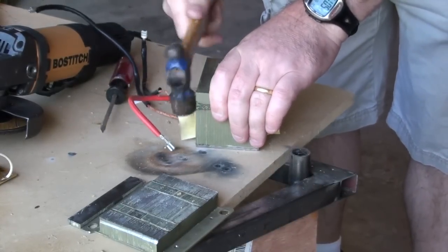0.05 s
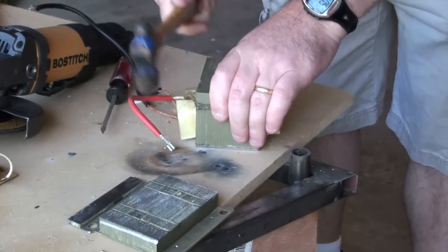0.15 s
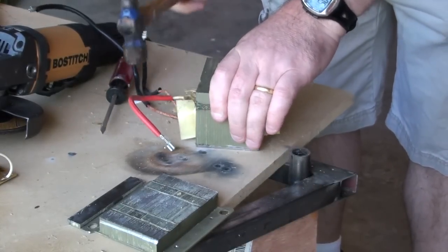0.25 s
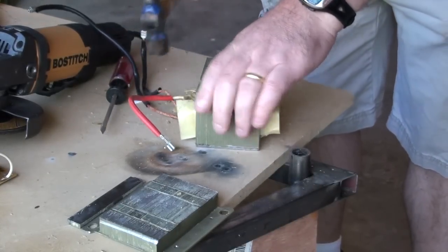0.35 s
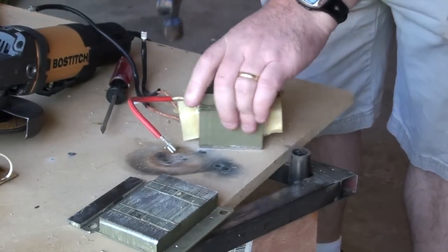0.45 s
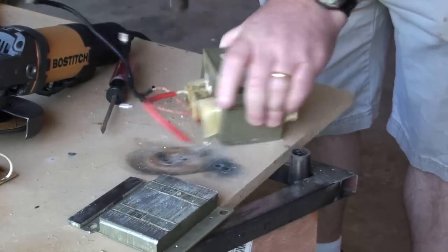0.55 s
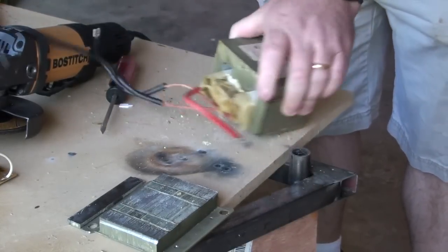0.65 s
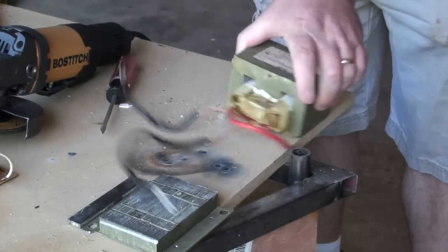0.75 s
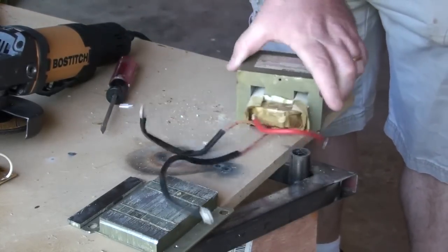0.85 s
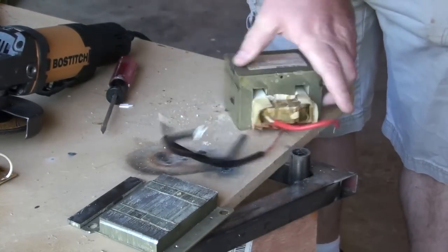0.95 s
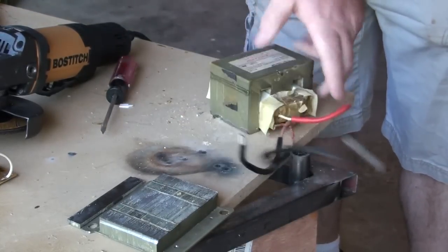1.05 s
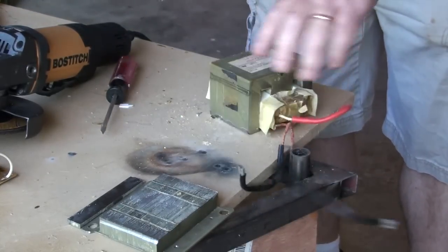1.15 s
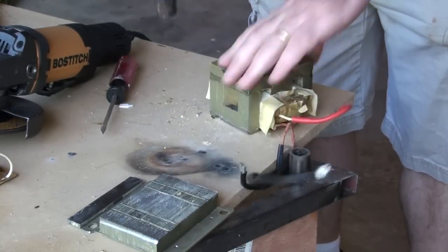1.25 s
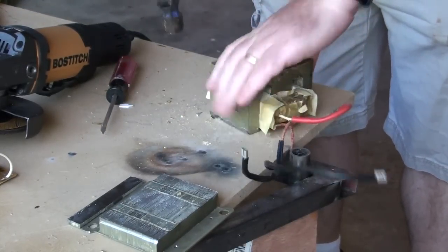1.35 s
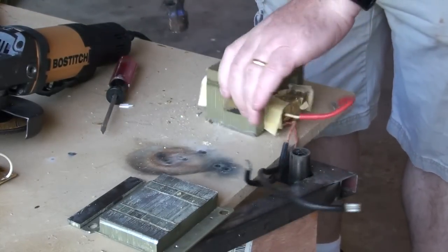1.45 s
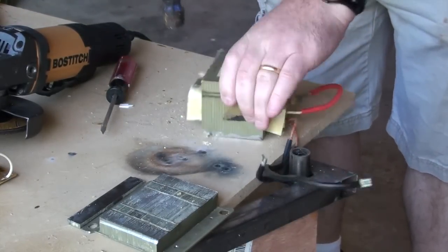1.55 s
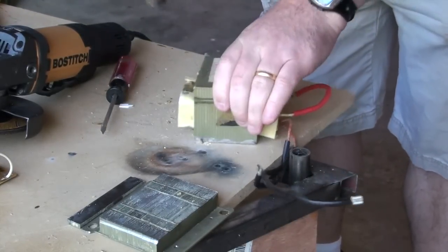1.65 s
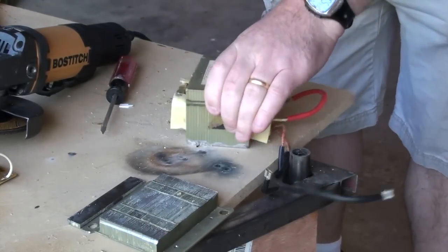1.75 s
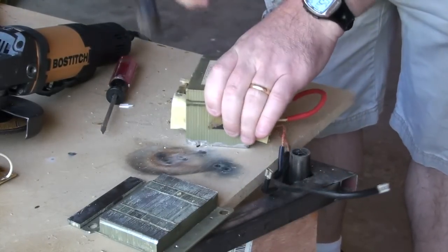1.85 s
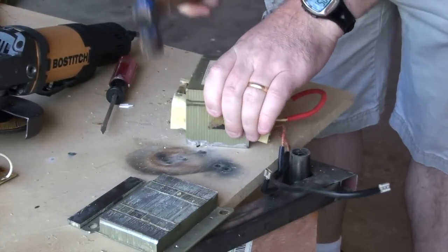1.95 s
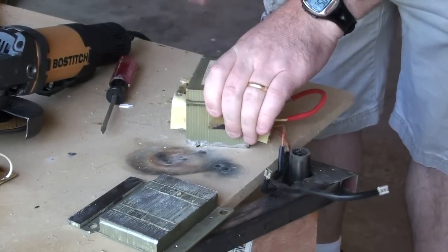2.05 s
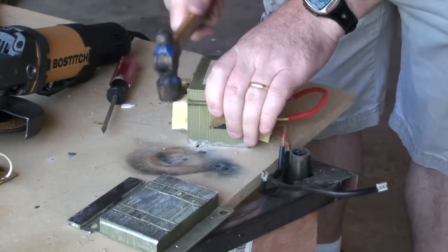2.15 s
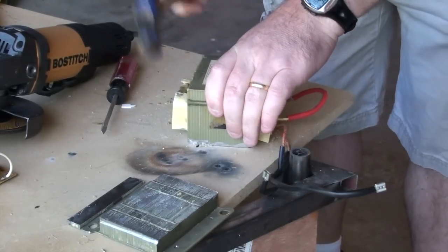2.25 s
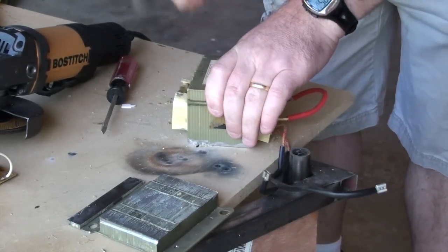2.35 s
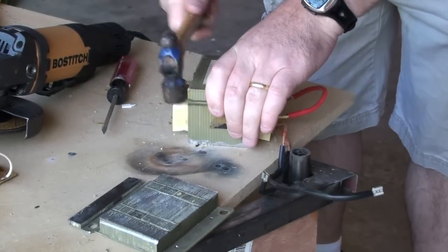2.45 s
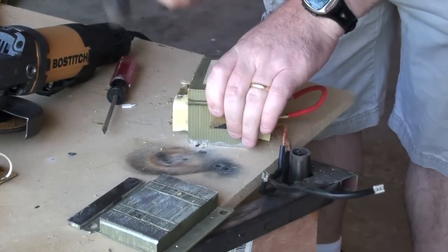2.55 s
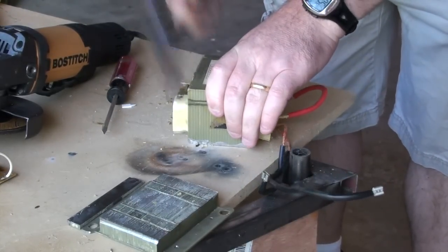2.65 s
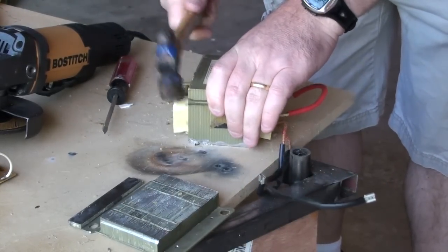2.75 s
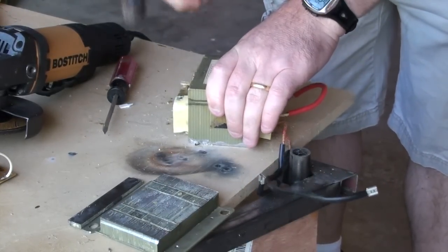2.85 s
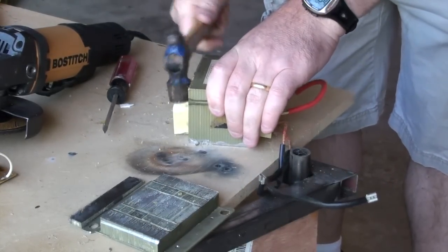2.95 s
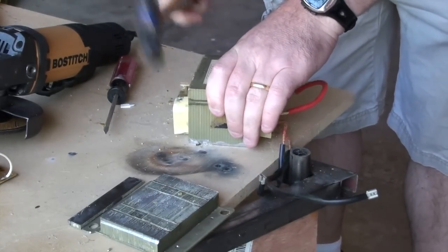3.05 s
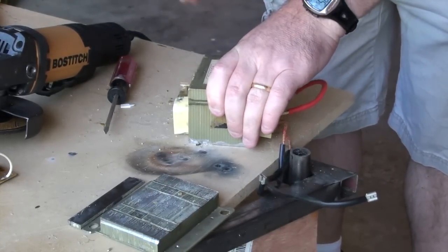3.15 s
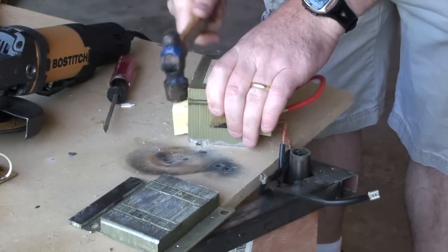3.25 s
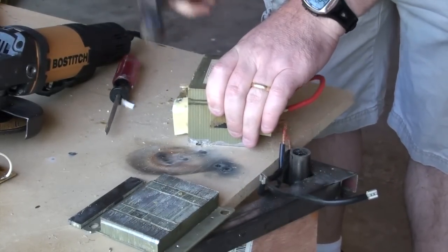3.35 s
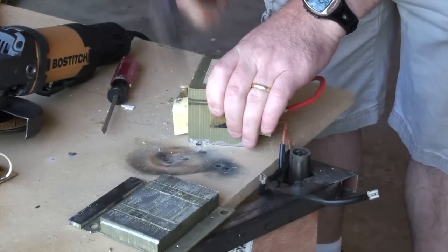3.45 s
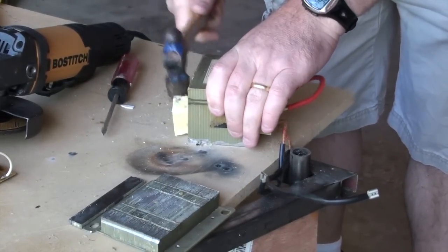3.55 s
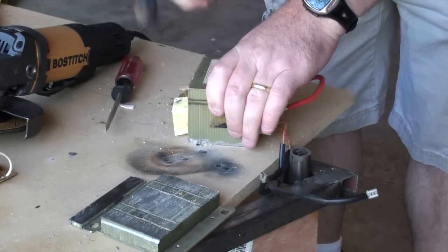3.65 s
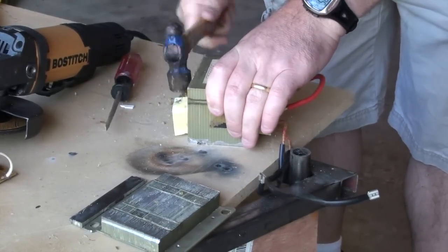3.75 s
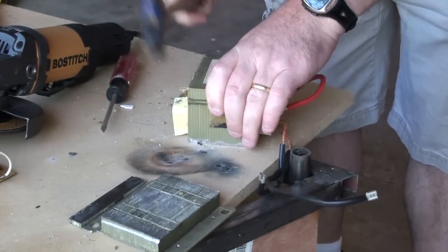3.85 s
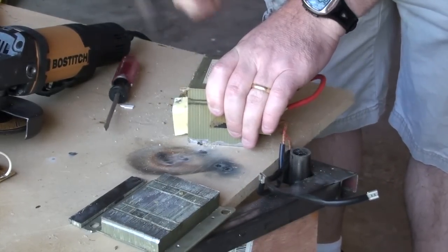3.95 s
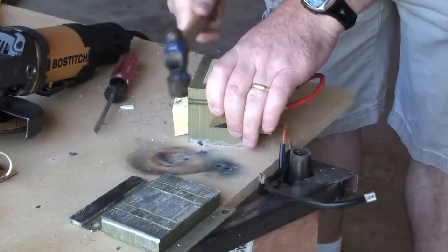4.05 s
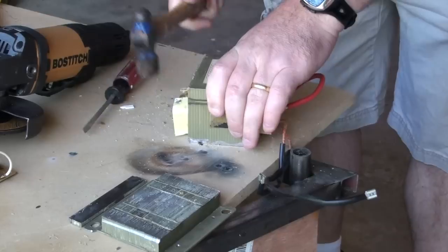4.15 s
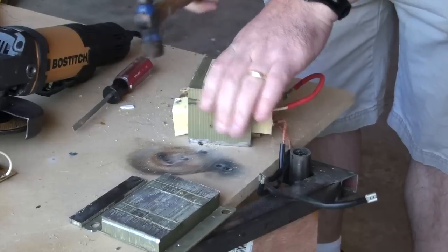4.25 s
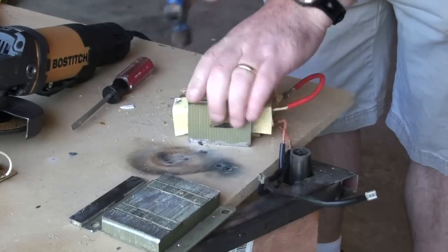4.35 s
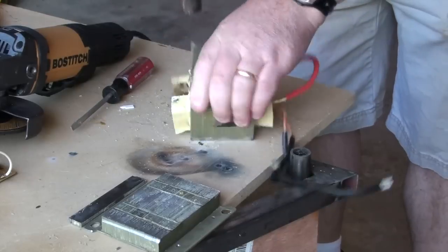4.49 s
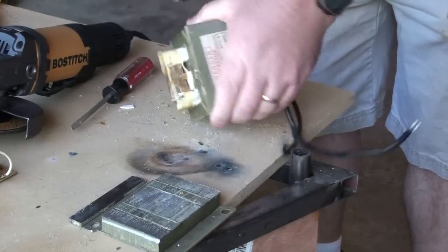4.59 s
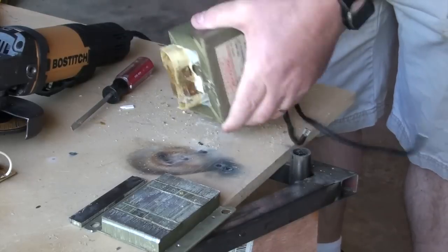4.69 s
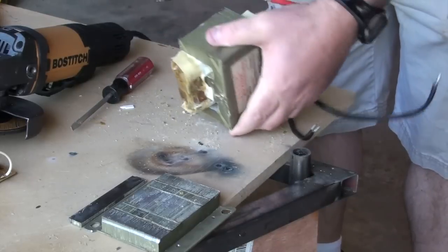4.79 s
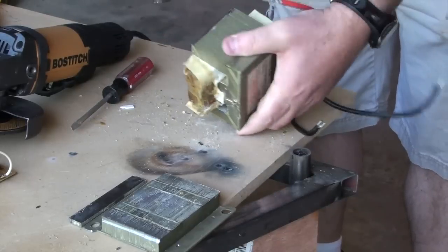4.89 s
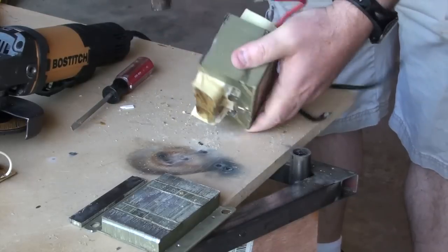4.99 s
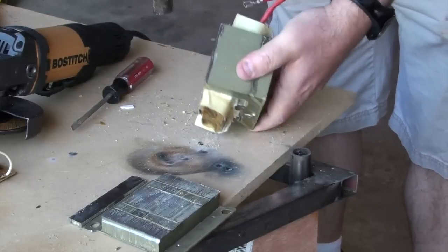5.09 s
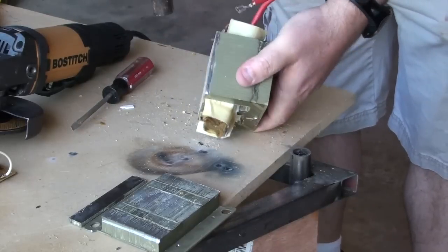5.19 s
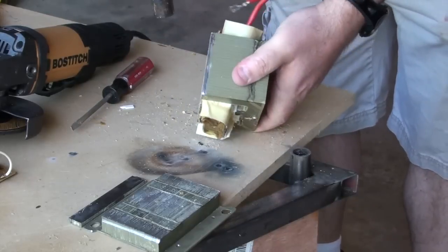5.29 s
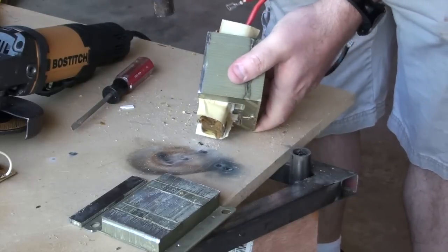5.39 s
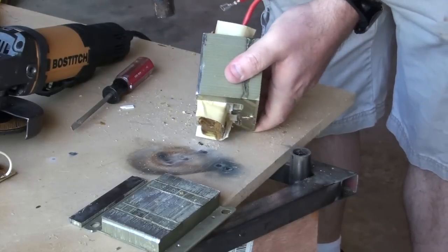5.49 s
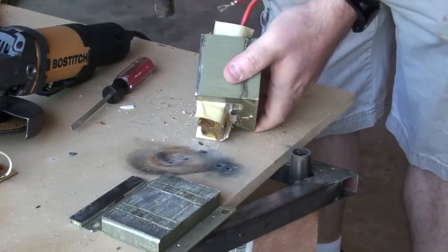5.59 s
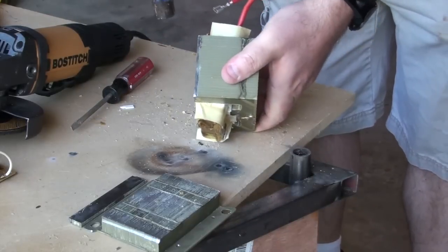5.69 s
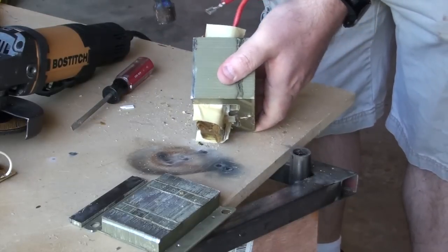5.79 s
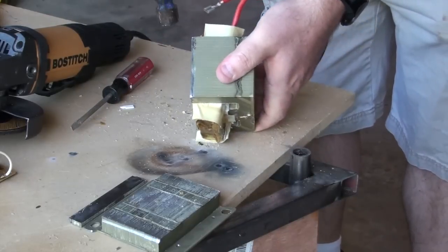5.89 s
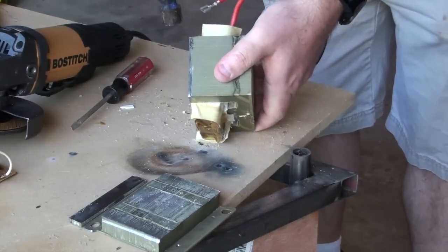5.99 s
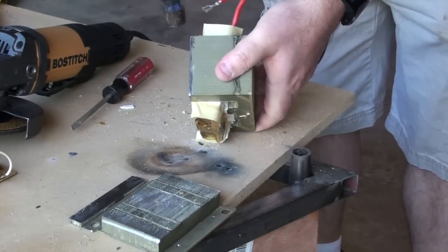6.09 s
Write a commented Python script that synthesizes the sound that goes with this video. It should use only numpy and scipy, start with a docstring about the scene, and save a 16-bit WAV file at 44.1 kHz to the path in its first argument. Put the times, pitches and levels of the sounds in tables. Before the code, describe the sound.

Close up in a small workshop with a faint rumble and hiss, heavy hammer blows land on laminated steel, each a sharp crack with a woody bench thump, short clank and clatter. After the first there is light knocking and a gritty shove; then a steady run of about four blows per second, turning more ringing. It stops, leaving soft handling knocks, weak scrapes and finally crisp little snaps and a squeak.

```python
"""A hammer blow is already dying away as the next cracks on the steel core of a transformer, held down
on a wooden bench in a small, quiet workshop; a run of blows follows. Each is a noise crack, damped bench modes,
a pitched clank, noise clatter and a steel ring, held down by a fast limiter while it dies.
Between and after the blows the core knocks, and slides over grit, made of dense clicks. Scattered ticks of grit
and stiff insulation, noise snaps with a tiny ring and a dull tail, gather at the end; a tiny squeak is last."""
import sys
import numpy as np
from scipy import signal
from scipy.fft import rfft, irfft
from scipy.io import wavfile
from scipy.ndimage import uniform_filter1d

SR = 44100
rng = np.random.default_rng(int(sys.argv[2]) if len(sys.argv) > 2 else 0)


def waveform_to_disk(signal):
    """Save audio, clipped to [-1, 1], as 16-bit WAV at the path in sys.argv[1]."""
    frames = np.transpose(np.atleast_2d(signal))
    scaled = np.clip(frames, -1, 1) * 32767
    samples = np.round(scaled).astype(np.int16)
    wavfile.write(sys.argv[1], SR, samples)


N = 270333  # length of the scene in samples


def gain_of(db):
    """Turns decibels into an amplitude factor."""
    return 10 ** (np.asarray(db) / 20)


def evened(x):
    """Scales a sound to rms 1."""
    return x / np.sqrt(np.mean(x ** 2) + 1e-20)


def read(points, hz):
    """Reads a curve between its points, along a logarithmic frequency axis."""
    f, value = np.transpose(points)
    return np.interp(np.log(hz + 1), np.log(f + 1), value)


def add(mix, s, sound):
    """Mixes a sound in at time s, cut to the length of the scene."""
    start = round(s * SR)
    sound = sound[..., max(-start, 0):]
    part = mix[:, max(start, 0):][:, :sound.shape[-1]]
    part += sound[..., :part.shape[1]]


def coloured(x, points, tilt_db=0):
    """Gives x a spectrum, tilted in dB per octave about 1 kHz, at rms 1."""
    hz = np.fft.rfftfreq(x.shape[-1], 1 / SR)
    octaves = np.log2(np.maximum(hz, 250) / 1000)  # the tilt stops below 250 Hz
    colour_db = read(points, hz) + tilt_db * octaves
    return evened(irfft(rfft(x) * gain_of(colour_db), x.shape[-1]))


def spread(pair, width):
    """Two unrelated signals become diffuse stereo: one is the middle, the other the side."""
    hz = np.fft.rfftfreq(pair.shape[1], 1 / SR)
    side = irfft(rfft(pair[1]) * gain_of(read(width, hz)), pair.shape[1])
    return np.array([pair[0] + side, pair[0] - side])


def ringing(modes, size, pitch=1):
    """Adds up the damped sines of a struck solid, with alternating sign."""
    t = np.arange(size) / SR
    out = 0
    for k, (hz, db, t60) in enumerate(modes):
        fade = gain_of(db - 60 * t / t60)
        out = out + (-1) ** k * fade * np.sin(2 * np.pi * hz * pitch * t)
    return out


def burst(points, tilt_db, decay_s, size=2048):
    """A short coloured noise burst whose rise is ten times as quick as its decay."""
    t = np.arange(size) / SR
    noise = coloured(rng.standard_normal(size), points, tilt_db)
    return noise * np.exp(-t / decay_s) * (1 - np.exp(-10 * t / decay_s))


ECHO_S, ECHO_DB = .0057, -6.5  # delay and level of the nearest reflection


def echoed(x):
    """Adds the nearest reflection, a single delayed copy."""
    late = np.pad(x, ((0, 0), (round(ECHO_S * SR), 0)))[:, :N]
    return x + gain_of(ECHO_DB) * late


# Decay of the workshop, before the early and late factors: [hz, t60_s]
ROOM_DECAY = [(60, 0.5), (150, 0.21), (300, 0.41), (700, 0.41), (1900, 0.37), (5000, 0.42), (9000, 0.33),
              (15000, 0.74)]


def dying(x, early=0.72, late=1.289, late_db=-14):
    """Each band dies away with the room: fast at first, then more slowly; early and late scale its t60."""
    hz, t, z = signal.stft(x, SR, nperseg=256)
    fall_db = -60 * t / read(ROOM_DECAY, hz)[:, None]
    fade = np.hypot(gain_of(fall_db / early), gain_of(late_db + fall_db / late))
    return signal.istft(z * fade, SR, nperseg=256)[1][:, :x.shape[1]]


# Stereo width of small sounds near the middle: [hz, side_db]
NEAR_WIDTH = [(50, -22), (120, -30.5), (230, -31), (400, -28), (700, -22), (1500, -26.5), (3000, -29),
              (12000, -18)]


def room(x, size=32768):
    """The diffuse answer of the workshop: convolution with a decaying noise tail of energy 1."""
    swell = 1 - np.exp(-np.arange(size) / SR / 0.0064)
    tail = dying(spread(rng.standard_normal((2, size)), NEAR_WIDTH)) * swell
    return signal.fftconvolve(x, tail / np.linalg.norm(tail[0]), axes=1)[:, :N]


def clank(hz, width, size, decay_s=.005, wet_db=-16):
    """The stacked plates answer briefly at one pitch: noise through a narrow peak, twice."""
    band = signal.iirpeak(hz, Q=10, fs=SR)
    noise = spread(rng.standard_normal((2, size)), width)
    x = evened(signal.lfilter(*band, signal.lfilter(*band, noise)))
    return x * np.exp(-np.arange(size) / SR / decay_s) + gain_of(wet_db) * dying(x)


# Modes of the bench top and steel frame, before the softness of the contact: [hz, level_db, t60_s]
BENCH_MODES = [(90.2, -23, 0.38), (159.9, -10, 0.34), (170.4, -9.5, 0.22), (201.4, -16, 0.33),
               (265.7, -30.5, 0.58), (294.9, -10, 0.38), (334.1, -10, 0.36), (383.7, -16, 0.31),
               (483.5, -9, 0.35), (567, -15, 0.43), (735, -22, 0.59), (819, -10, 0.23), (1468, -20, 0.29),
               (1590, -17, 0.3), (1736, -25.5, 0.38), (2010, -28.5, 0.43)]
# Colour of the plates' clatter: [hz, relative_db]
CLATTER_COLOUR = [(30, -38.5), (70, -14.5), (125, -10.5), (165, 3.5), (400, 0), (780, -1.5), (1050, -5.5),
                  (1900, -7), (3000, -13), (5000, -21), (8000, -24.5), (10500, -37.5), (13000, -51),
                  (16000, -48.5)]
# Colour of the contact crack: [hz, relative_db]
CRACK_COLOUR = [(40, -35.5), (200, -2), (550, 13.5), (1200, -4), (1900, 7), (3300, -3), (5500, -8.5),
                (8000, -13.5), (11000, -19.5), (13000, -29), (16000, -36.5)]


def impacts(rows, width, crack_db, crack_s, alike, swell_s, soft_db, size=32768):
    """Each impact cracks, clanks, rings the bench, and sends the clatter of the stacked plates round the room."""
    direct = np.zeros((2, N))
    out = np.zeros((2, N))
    t = np.arange(size) / SR
    swell = 1 - np.exp(-t / swell_s)
    # a soft contact loses soft_db an octave, so it rings mostly the low modes
    modes = [(hz, db - soft_db * np.log2(max(hz, 160) / 250), t60) for hz, db, t60 in BENCH_MODES]
    bench = ringing(modes, size) * (1 - np.exp(-t / 0.015))
    # the same paths carry every impact, so much of the fine pattern repeats
    usual = rng.standard_normal((2, size))
    for s, force_db, tilt_db, sharp_db, thump_db, clank_hz, clank_db, *_ in rows:
        paths = np.sqrt(alike) * usual + np.sqrt(1 - alike) * rng.standard_normal((2, size))
        clatter = dying(coloured(spread(paths, width), CLATTER_COLOUR, tilt_db)) * swell
        thump = gain_of(thump_db) * bench
        plates = gain_of(clank_db) * clank(clank_hz, width, size)
        add(out, s, gain_of(force_db) * (clatter + thump + plates))
        crack = burst(CRACK_COLOUR, tilt_db, crack_s)
        add(direct, s, gain_of(force_db + sharp_db + crack_db) * crack)
    return out + echoed(direct)


# Hammer blows, the crack, thump, clank and ring relative to the force:
# [start_s, force_db, tilt_db_per_octave, crack_db, thump_db, clank_hz, clank_db, ring_db]
BLOWS = [(-.2, 3, -1.5, 0, -0.5, 1890, -17, -29), (0.0773, -1, 0, -3, 1, 1840, -9.5, -25.5),
         (2.2, 0.5, -0.75, 3, -1.5, 3870, -10.5, -3), (2.4897, -0.5, 1, 1, 1.5, 1950, 0.5, -1),
         (2.7668, 1, .5, 5, -1, 4960, -8, -23.5), (3.0276, 1, 0.5, 5.5, 0, 5530, -6.5, -27.5),
         (3.3034, -0.5, -0.5, 2.5, -2, 1980, -19, -22), (3.574, 3, -0.42, 0, -5.5, 1450, -14.5, 3.5),
         (3.8308, 2.5, -.5, 2, -4.5, 1300, 1, 6.5), (4.086, 3, -0.63, -2, -4, 1423, -0.5, 1.5)]
# High ring of the struck steel: [hz, level_db, t60_s]
STEEL_MODES = [(6702, -32, .22), (11660, -30, .25), (14153, -44, .26)]
# A loose steel plate lying on the bench sings on: [hz, level_db, t60_s]
PLATE = [(1040, -55.5, 4.4)]


def steel(build_s=0.015, plate_share=0.29, waver_db=4.5):
    """Each blow leaves a thin ring that builds up and wavers; a stronger ring shakes the loose plate a little more."""
    out, t = np.zeros((2, N)), np.arange(N) / SR
    plate_hz, plate_db, plate_t60 = PLATE[0]
    plate_energy = np.zeros((1, N))
    for s, force_db, *_, ring_db in BLOWS:
        drift = uniform_filter1d(uniform_filter1d(rng.standard_normal(SR), size=900), size=700)
        waver = gain_of(waver_db * evened(drift))
        pitch = 1 + 0.00065 * rng.standard_normal()
        ring = ringing(STEEL_MODES, SR, pitch) * (1 - np.exp(-t[:SR] / build_s))
        add(out, s, gain_of(force_db + ring_db) * ring * waver)
        shaken_db = force_db + plate_db + plate_share * ring_db - 60 * t / plate_t60
        add(plate_energy, s, gain_of(shaken_db) ** 2)
    return out + np.sqrt(plate_energy) * np.sin(2 * np.pi * plate_hz * t)


# Stereo width of the whole shaken bench: [hz, side_db]
BENCH_WIDTH = [(50, -8), (150, -16.5), (330, -12), (700, -11.5), (1500, -13), (4000, -29.5), (12000, -13)]
# Stereo lean of the blows: [hz, left_minus_right_db]
LEAN = [(60, 2), (150, 1.5), (300, 1), (450, -0.3), (12000, 0.5)]


def hammering():
    """Heavy blows shake the whole bench, whose bass reaches the left channel more."""
    blows = impacts(BLOWS, BENCH_WIDTH, crack_db=5.5, crack_s=0.0025, alike=0.45, swell_s=0.012, soft_db=1.0)
    x = blows + steel()
    lean_db = read(LEAN, np.fft.rfftfreq(2 * N, 1 / SR))
    lean = gain_of(np.array([lean_db, -lean_db]) / 2)
    return irfft(rfft(x, 2 * N) * lean)[:, :N]


# Colour of the quiet workshop: [hz, relative_db]
FLOOR_COLOUR = [(20, -11.5), (60, 4.5), (100, -4.5), (170, -1), (300, -17.5), (600, -15.5), (900, -18),
                (1600, -17.5), (3000, -25), (8000, -31), (10000, -39.5), (16000, -39.5)]
# Stereo width of the far background: [hz, side_db]
FAR_WIDTH = [(30, -28.5), (100, -30), (200, -18.5), (400, -4.5), (1500, -2), (4000, -6.5), (12000, -15)]
FLOOR_DB = -58  # rms level


def workshop():
    """The quiet rumble and hiss of the room: steady, diffuse coloured noise."""
    noise = spread(rng.standard_normal((2, N)), FAR_WIDTH)
    return gain_of(FLOOR_DB) * coloured(noise, FLOOR_COLOUR)


# Light taps and the core knocking on the bench; the row at .903 is the low thump of the heavy scrape.
# Crack, thump and clank are relative to the force:
# [start_s, force_db, tilt_db_per_octave, crack_db, thump_db, clank_hz, clank_db]
KNOCKS = [(.045, -37, -7, 3, -9, 955, 9), (.548, -49, 2.5, -8, 14, 1440, -4),
          (.653, -39, 0.5, -6.5, -20, 1490, -1), (.825, -37, 1.5, -12, -2, 1330, -5),
          (.831, -35, 0, 4, 6, 2720, 5.5), (.903, -39, -10, -6, 14, 820, -4),
          (.943, -33, 0.5, -2.5, -9, 2100, -12), (.965, -24, -5.5, -4, -12, 730, 2),
          (4.5483, -52, 2.5, 4, 16, 1410, -8), (4.6086, -47, 2, 1.5, 11.5, 1456, 5),
          (4.7234, -50.5, 2.5, 0.5, -22, 1470, 10), (5.0476, -48, -1.5, -1.5, -5, 1500, 2)]


def knocks_and_thump():
    """Light, soft contacts and the scrape's low thump, near the middle, ring mostly the low modes of the bench."""
    return impacts(KNOCKS, NEAR_WIDTH, crack_db=10, crack_s=0.0018, alike=.4, swell_s=0.0028, soft_db=9)


START_DB, RELEASE_DB_PER_S = -24.5, 163  # where a push swells from, and its added fall after length_s


def push(t, rise_s, length_s, sag_db_per_s):
    """Level in dB of one push or dull tail, t seconds after its start: swell, sag, release."""
    swell_db = START_DB * np.maximum(1 - t / rise_s, 0)
    sag_db = sag_db_per_s * np.maximum(t - rise_s, 0)
    release_db = RELEASE_DB_PER_S * np.maximum(t - length_s, 0)
    return swell_db - sag_db - release_db


# Pushes of the core over the bench; the short rows at 5.813 and 5.975 are the dull tail of the ticks.
# Length is counted from the start, hiss is relative to the level:
# [start_s, rise_s, length_s, level_db, sag_db_per_s, hiss_db]
SLIDES_AND_TAILS = [(.538, 0.013, .14, -47.5, 0, -10.5), (.82, 0.0067, 0.29, -39.5, 0, -9.5),
                    (1.29, 0.028, 0.025, -66, 21, -6), (1.475, .11, 0.37, -32.5, 52.5, -11),
                    (4.52, 0.065, .11, -50, 18, -7), (4.69, 0.02, 0.06, -59.5, 19, -6),
                    (4.979, 0.053, 0.22, -56, 21.5, -6), (5.25, 0.076, 0.15, -68, 22, -0.5),
                    (5.813, 0.017, 0.024, -50, 22.5, 3), (5.975, 0.012, 0.061, -52, 108, 3),
                    (6.08, 0.013, 0.021, -56.5, 20.5, -3.5)]
# Colour of the scraping grit: [hz, relative_db]
GRIT_COLOUR = [(40, -21), (110, -13), (170, -7.5), (350, -4), (750, -8.5), (1080, -15.5), (1500, -9.5),
               (2700, -17), (5000, -18), (8000, -23.5), (11000, -32.5), (16000, -43.5)]
# Modes of the core and bench top as they rub: [hz, relative_db, t60_s]
RUB_MODES = [(168.7, -18, 0.37), (380.5, -1.5, 0.14), (484, -7.5, 0.3), (590, 0, .06), (762, -3.5, 0.13),
             (837, 2, 0.059), (1360, -1, 0.03), (1484, -2.5, 0.077)]


def slides_and_tails(grains_per_s=1500, grain_db=1.5, sing_db=-2, wet_db=-8, split_hz=2800, judder_db=2.45):
    """Grit under the sliding core: dense clicks hiss and set core and bench singing; they also tail the ticks."""
    # the core sticks and slips, so the grains swell and fade in clumps
    judder = evened(uniform_filter1d(uniform_filter1d(rng.standard_normal(N), size=300), size=200))
    strength_db = grain_db * np.minimum(rng.exponential(1, (2, N)), 5) + judder_db * judder
    grains = gain_of(strength_db) * rng.standard_normal((2, N))
    clicks = spread(grains * (rng.random((2, N)) < grains_per_s / SR), NEAR_WIDTH)
    rub = coloured(clicks + room(clicks), GRIT_COLOUR)
    low = evened(signal.sosfilt(signal.butter(4, split_hz, "low", fs=SR, output="sos"), rub))
    high = evened(signal.sosfilt(signal.butter(4, split_hz, "high", fs=SR, output="sos"), rub))
    sing = evened(signal.fftconvolve(clicks, ringing(RUB_MODES, SR)[None], axes=1)[:, :N])
    t = np.arange(SR) / SR
    body_gain, hiss_gain = np.zeros((1, N)), np.zeros((1, N))
    for s, rise_s, length_s, level_db, sag_db_per_s, hiss_db in SLIDES_AND_TAILS:
        envelope_db = level_db + push(t, rise_s, length_s, sag_db_per_s)
        add(body_gain, s, gain_of(envelope_db))
        add(hiss_gain, s, gain_of(envelope_db + hiss_db))
    out = body_gain * (low + gain_of(sing_db) * sing) + hiss_gain * high
    return out + gain_of(wet_db) * room(out)


# Snaps of grit and stiff insulation, and a tiny low-pitched squeak last; the pitch factor acts on the ring:
# [start_s, ring_db, snap_db, pitch_factor]
TICKS_AND_SQUEAK = [(1.1, -46, -27.5, 1), (1.615, -35, -26, 1), (2.16, -55, -45, .93),
                    (4.808, -64, -52, .93), (5.0016, -46, -51, 1.26), (5.8351, -34, -25, 1.4),
                    (5.8869, -27, -28, 0.96), (5.9804, -24.5, -36, 0.91), (5.9898, -23, -25.5, 0.91),
                    (6.02, -22.5, -29, .97), (6.035, -26.5, -22.5, 1.43), (6.096, -35, -45, 0.61)]
# Ring of the insulation at pitch factor 1: [hz, relative_db, t60_s]
INSULATION_MODES = [(3500, -2, 0.0087), (3790, 4, 0.0043), (5250, -10, 0.0052)]
# Colour of the bright snap: [hz, relative_db]
SNAP_COLOUR = [(100, -4.5), (2000, -7.5), (3200, 3), (5200, -1.5), (7000, 0), (8500, -1.5), (10500, -10),
               (12000, -7), (16000, -17)]


def ticks_and_squeak(snap_s=0.00046, wet_db=-10):
    """Tiny noise snaps close by, each with a few milliseconds of ring, which is the squeak in the last."""
    out = np.zeros((2, N))
    for s, ring_db, snap_db, pitch in TICKS_AND_SQUEAK:
        ring = gain_of(ring_db) * ringing(INSULATION_MODES, 2048, pitch)
        snap = gain_of(snap_db) * burst(SNAP_COLOUR, 0, snap_s)
        add(out, s, ring + snap)
    return echoed(out) + gain_of(wet_db) * room(out)


def scene():
    """Adds the blows, the room, the knocks and thump, the slides and tails, and the ticks and squeak."""
    return hammering() + workshop() + knocks_and_thump() + slides_and_tails() + ticks_and_squeak()


EDGE_HZ = 15900  # upper band limit


def record(dry, ceiling_db=-8.0, recovery_db_per_s=220, attack_size=48, detector_size=80):
    """A fast limiter (sizes in samples) flattens the blows and their peaks round off; then the band limit."""
    power = abs(uniform_filter1d((dry ** 2).mean(0), detector_size))
    power_db = 10 * np.log10(power + 1e-12)
    # the held level jumps up with the power and falls back at the recovery rate
    fall_db = np.arange(N) * recovery_db_per_s / SR
    held_db = np.maximum.accumulate(power_db + fall_db) - fall_db
    over_db = np.maximum(held_db - ceiling_db, 0)
    x = dry / gain_of(uniform_filter1d(over_db, attack_size))
    x = x / (1 + x ** 6) ** (1 / 6)  # rounds off the peaks
    lowpass = signal.firwin(255, EDGE_HZ, window=("kaiser", 9), fs=SR)
    return signal.oaconvolve(x, lowpass[None], "same")


dry = scene()
out = record(dry)
waveform_to_disk(out)
```